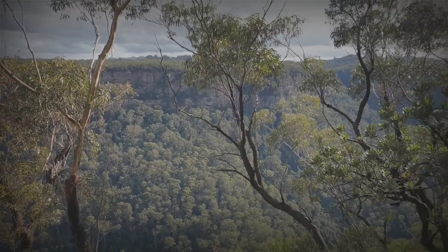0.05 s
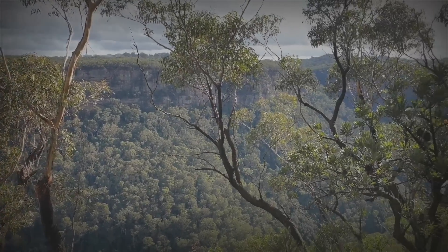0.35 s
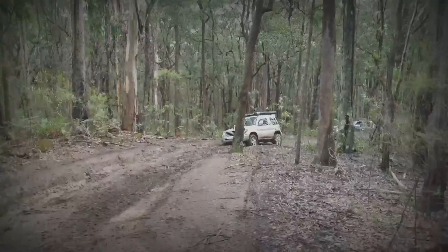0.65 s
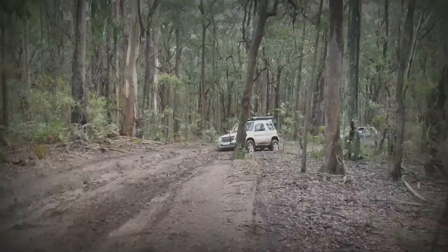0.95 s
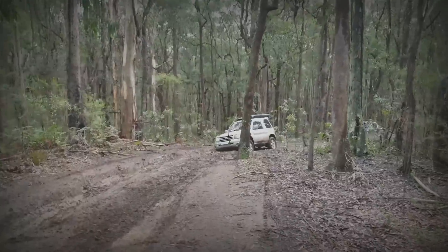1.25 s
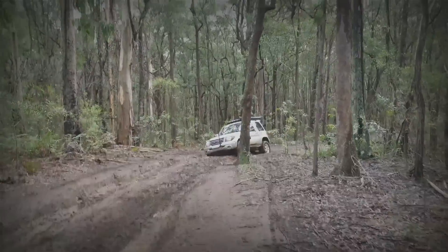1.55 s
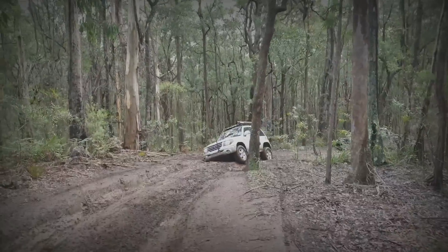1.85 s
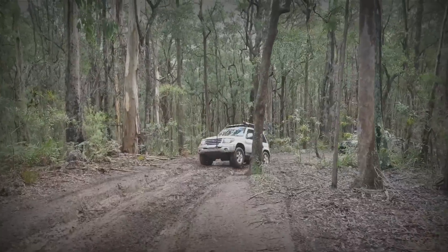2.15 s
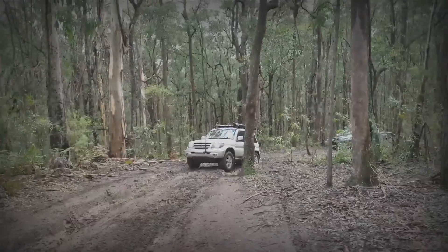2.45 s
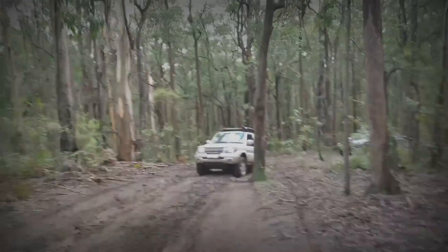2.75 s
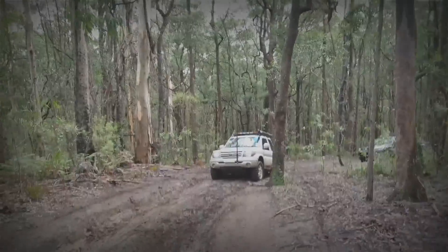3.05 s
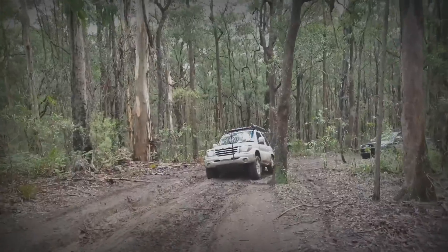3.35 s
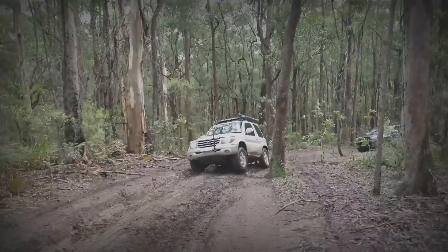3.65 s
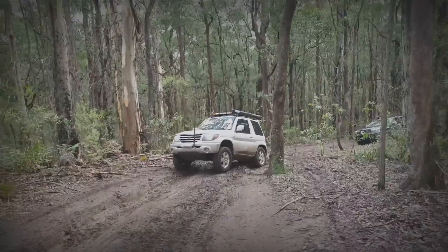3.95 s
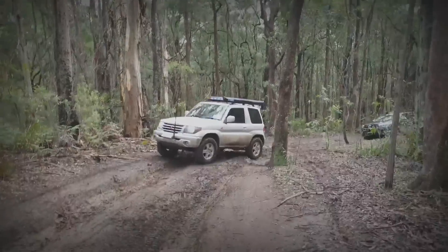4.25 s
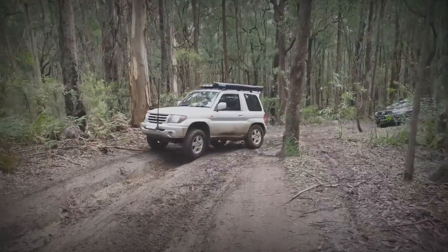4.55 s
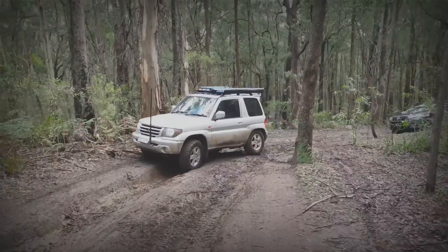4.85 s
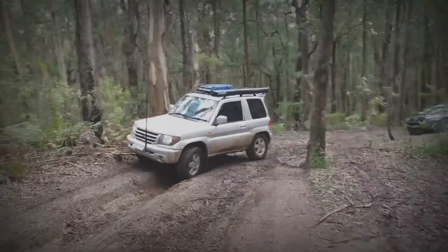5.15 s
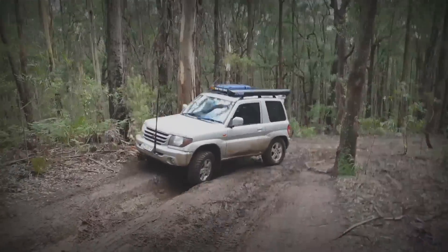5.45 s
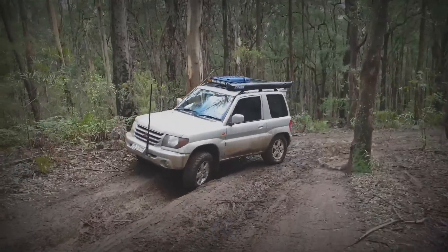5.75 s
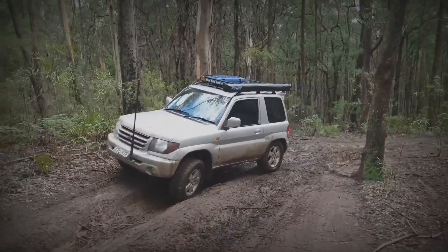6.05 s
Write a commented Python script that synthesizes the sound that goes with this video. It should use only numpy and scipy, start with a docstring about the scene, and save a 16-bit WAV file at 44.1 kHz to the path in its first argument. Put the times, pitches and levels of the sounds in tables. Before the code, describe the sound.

It opens very quietly with valley air, a stir of leaves, a faint thin drone and one distant falling bird call. At about 0.7 seconds a small four-wheel drive takes over, much louder, crawling closer along a muddy forest track. Its engine chugs low at first, with a booming exhaust, then revs up from 2 seconds to a peak near 2.8. It stays high, growling and rasping under load, sags around 4.8, surges again just after 5 and eases toward 6 seconds. Tyres rumble and crunch over leaves and grit throughout. From 2.5 seconds the wheels slip in short bursts, scrubbing, throwing dirt and scraping stones, with a faint metallic ringing. Twigs snap now and then, most clearly near 2.9, 4.6 and 6 seconds. The suspension gives double knocks around 2 and 4.4 seconds. The sound is stereo from the trackside, with a light echo from the trees.

```python
"""A stereo pair beside a muddy forest track. First, quiet valley air, leaves, one far bird and a thin drone
that stays. At 0.65 s a small four-wheel drive takes over, crawling from 22 m to 8 m off the microphones.
Its four-cylinder engine revs up and down: the exhaust booms, the intake growls and rasps, the fan rushes,
and trunks scatter the engine's tones. On the way in, tyres rumble and crunch, twigs snap and the
suspension knocks; from 2.5 s the wheels slip now and then, and after 4 s the car turns side-on."""
import sys
import numpy as np
from scipy import signal
from scipy.fft import rfft, irfft, next_fast_len
from scipy.io import wavfile
from scipy.ndimage import uniform_filter1d, map_coordinates

SR = 44100
rng = np.random.default_rng(int(sys.argv[2]) if len(sys.argv) > 2 else 0)


def output_pcm(signal):
    """Save a mono or channel-first signal as 16-bit PCM at the path in sys.argv[1].

    Samples are clipped to [-1, 1] before scaling.
    """
    pcm = np.clip(np.atleast_2d(signal).T, -1, 1) * 32767
    wavfile.write(sys.argv[1], SR, np.round(pcm).astype(np.int16))


N = 269451
T = np.arange(N) / SR
FREQS = np.fft.rfftfreq(N, 1 / SR)

# far-off air in the valley: (frequency [Hz], relative level [dB])
VALLEY_AIR = [(25, -20), (60, -2.5), (90, -0.5), (140, -15), (190, -8.5), (226, -0.5), (280, -14),
              (400, -26), (660, -20.5), (900, -20.5), (1600, -19), (2500, -23), (3600, -43), (5000, -65)]
# a breeze stirs the leaves; the level drops sharply at 0.5 s: (time [s], level [dB])
BREEZE = [(0, -61), (.04, -49.5), (.075, -66.5), (.24, -75.5), (.48, -73), (.5, -103)]
# rustle of those leaves: (frequency [Hz], relative level [dB])
LEAVES = [(1500, -2), (3300, 3), (4500, -2.5), (6800, 5.5), (8000, -4), (9500, 3), (11000, 0), (15500, -2)]
# a distant bird's falling call: (time [s], pitch [Hz], level [dB])
BIRD_CALL = [(.05, 2720, -80), (.085, 2520, -59), (.1, 2450, -58), (.13, 2050, -61), (.19, 1780, -61),
             (.25, 1340, -63), (.28, 1280, -85)]
# far-off drone: (frequency [Hz], level [dB])
DRONE_TONES = [(226, -63.5), (667, -72), (1570, -74)]

# twigs snapping on the track: (time [s], relative level [dB], band centre [Hz])
TWIG_SNAPS = [(0.751, -40.5, 11300), (0.954, -37, 9000), (1.1672, -48, 9000), (1.4531, -49, 4180),
              (1.651, -38, 3650), (1.703, -38, 6960), (2.876, -28, 3534), (4.57, -33, 6985),
              (5.381, -38, 5265), (6.018, -32, 4050)]
# suspension knocks: (time [s], relative level [dB], pitch against the chassis modes [ratio])
KNOCKS = [(1.167, -41, 1.65), (2.02, -29, 1), (2.083, -29.5, 1), (4.351, -27, 1.08), (4.385, -27, 1.05)]
# chassis modes: (frequency [Hz], relative level [dB], time to fall 60 dB [s])
CHASSIS_MODES = [(700, 39, 0.026), (980, 30, 0.052), (1085, 32, 0.069), (1190, 8, 0.043), (1460, 2, 0.033)]
# tyres rumbling on the ground: (frequency [Hz], relative level [dB])
GROUND_RUMBLE = [(20, -36), (31, -7), (42, -1), (65, 8.5), (100, 9.5), (135, 5), (180, 7.5), (300, -32)]
# leaf litter pressed under the tyres: (frequency [Hz], relative level [dB])
LEAF_LITTER = [(700, -1), (1400, 5.5), (2400, 0.5), (4200, -3.5), (6500, -8.5), (9000, -29), (15000, -36)]
# hiss of dirt and grit: (frequency [Hz], relative level [dB])
DIRT_HISS = [(3000, 9), (4800, 5.5), (6000, 3.5), (7200, 5.5), (8300, 0.5), (9300, 4), (10500, 3),
             (11500, 5), (12500, 1.5), (15500, 1)]
# tyres slipping: (time [s], length [s], scrub [dB], thrown dirt [dB], scrape [dB])
SLIPS = [(2.53, 0.091, -55, -49, -60), (2.623, 0.17, -48, -40, -61), (2.692, 0.065, -53, -40.5, -46),
         (3.14, 0.22, -42, -41.5, -45), (3.401, 0.45, -69, -57, -55), (3.827, 0.15, -42.5, -67, -70),
         (4.251, 0.19, -37.5, -45, -45), (4.92, 0.11, -44, -42.5, -54), (5.657, 0.42, -70, -58, -40.5)]
# scrub of the tread: (frequency [Hz], relative level [dB])
TREAD_SCRUB = [(700, -47), (950, 1), (1090, 12.5), (1280, 7), (1500, 0.5), (2200, -38)]
# stones scraping under a tyre: (frequency [Hz], relative level [dB])
STONE_SCRAPE = [(1500, -9.5), (2700, -6), (3700, -1.5), (4500, -4.5), (5600, -9), (8000, -13), (15000, -34)]

# rush of the fan: (frequency [Hz], relative level [dB])
FAN_RUSH = [(880, 4.5), (1500, -5.5), (1610, 4.5), (1900, 2), (2160, -6.5), (2370, 1.5), (3150, 2),
            (3420, -11), (3660, -3), (6000, -10), (7800, -45), (13200, -120)]
# share of valve rattle against the fan's rush; it swells mid-approach, dips near 4.6 s and partly
# returns: (time [s], share of power [0-1])
VALVE_SHARE = [(.66, 0), (2.7, 0.7), (3.8, 0.64), (4.6, 0.08), (6.11, 0.43)]
# engine block resonances: (frequency [Hz], width [Hz], relative level [dB])
BLOCK_MODES = [(1050, 330, 11.5), (1567, 130, 6), (2240, 60, 14), (3350, 39, -1.5), (3650, 900, 1.5),
               (4620, 160, 2)]
# drivetrain metal singing under strain: (time [s], length [s], centre [Hz], nominal width [Hz], level [dB])
METAL_RINGS = [(1.1, .3, 4760, 180, -67), (1.62, .8, 4780, 240, -63.5), (2.55, .3, 3190, 300, -47.5),
               (3.15, .65, 3190, 240, -46.5), (4.33, .14, 3190, 300, -50), (5.0, .35, 2900, 280, -50)]
# drone of the silencer's shell: (frequency [Hz], relative level [dB])
SILENCER_SHELL = [(150, -48), (200, -6.5), (232, 0.5), (258, -0.5), (310, -40)]
# low puffing of the intake air: (frequency [Hz], relative level [dB])
INTAKE_BODY = [(100, -18), (170, -64), (225, 12), (305, -3), (400, 14), (520, 7.5), (660, 1.5), (800, -6),
               (1100, -50)]
# rasp at the throttle: (frequency [Hz], relative level [dB])
INTAKE_RASP = [(500, 5.5), (820, 11), (1060, 1.5), (1250, 12), (1430, 1), (1600, 3), (1900, -6.5),
               (3000, -12.5)]
# bark of the open throttle: (frequency [Hz], relative level [dB])
INTAKE_BARK = [(280, -31), (420, 14), (580, -2), (690, -4), (820, 6.5), (1080, -15), (1400, 2), (2400, -52),
               (5000, -44)]
# intake resonances at the reference firing rate: (frequency [Hz], relative level [dB])
INTAKE_RESONANCES = [(200, 1.5), (275, 2.5), (305, -4.5), (345, 8.5), (410, -0.5), (470, -2.5), (535, 4.5),
                     (595, -0.5), (660, 8), (715, 0), (850, -9), (1020, 7), (1250, -25), (2000, -24)]
# exhaust boom off load: (firing rate [Hz], level [dB])
EXHAUST_BOOM = [(55, -32.5), (65, -26.5), (82, -25.5), (100, -31), (140, -31.5)]
# the boom drops out briefly: (time [s], level change [dB])
BOOM_DIPS = [(.95, -4.5), (1.295, -6.5), (1.42, -13), (2.359, -41), (2.6, -18), (2.83, -13), (3.03, -5),
             (3.135, -10), (3.49, -3.5), (4.27, -14), (4.53, -0.5), (5.45, -2), (5.87, -13)]
# engine speed: (time [s], firing rate [Hz])
REVS = [(.66, 54.6), (.97, 59.3), (1.2, 69.6), (1.38, 71.3), (1.49, 55.26), (1.7, 65.7), (1.93, 81.26),
        (2.1, 81.1), (2.26, 89.5), (2.51, 123.7), (2.68, 144.7), (2.8, 147), (3.0, 123.4), (3.11, 129.9),
        (3.24, 135.3), (3.42, 137.7), (3.55, 136.1), (3.67, 137.4), (3.87, 129.8), (4.03, 135.8),
        (4.18, 130.8), (4.31, 119.7), (4.48, 128.3), (4.62, 105.3), (4.88, 91), (5.08, 122.8),
        (5.24, 128.5), (5.42, 125), (5.6, 101.5), (5.85, 109.6), (6.11, 93)]
# pushes on the accelerator: (time [s], length [s], load [1 = hard pull],
# lift of firing order 1 [dB], of order 2 [dB], of order 3 [dB])
PEDAL_PUSHES = [(0.683, 0.092, 0.32, -2.5, 8, 4), (1.092, 0.35, 0.69, 3.5, 13, 0),
                (1.49, 0.46, 0.6, 5.5, 13.5, 13), (1.662, .27, 0.14, -2, 2, 0),
                (2.033, 0.27, 0.89, 10.5, 18, 13), (2.397, 0.21, 0.68, 6.5, 9, 18.5),
                (2.607, 0.084, 0.19, 13, 16, 25), (2.8, 0.09, 0.046, 7.5, 3, 0),
                (3.005, 0.084, 0.49, 10, 12, 7), (3.146, 0.072, 0.51, 14.5, 4, 14),
                (3.29, 0.12, 0.19, 6.5, 1, 6), (3.418, 0.34, 0.57, 9.5, 2, 10),
                (3.787, 0.14, 0.66, 3.5, 5, 17), (3.934, 0.21, 0.42, 10.5, 6.5, 14),
                (4.18, 0.24, 0.68, 4, 9, 14), (4.881, 0.08, 1.47, 15, 25.5, 7),
                (5.027, 0.12, 0.45, 2.5, -2, 11), (5.13, 0.21, 0.1, 7.5, -2, 16),
                (5.597, 0.18, 0.92, 3, 9, 7), (5.992, .15, 0.31, 6.5, -1, 4)]

# stereo width at the microphones: (frequency [Hz], side minus mid [dB])
MIC_WIDTH = [(60, -21), (125, -16.5), (250, -4.5), (500, -7), (1000, -4), (2000, -4.5), (4000, -3),
             (12000, 0.55)]
# balance of the pair: (frequency [Hz], left minus right [dB])
MIC_BALANCE = [(60, 1), (110, 1.5), (200, -0.5), (380, 3.5), (700, 3), (1290, 5), (2380, 1.5), (4400, -2.5),
               (8120, 2), (15000, 2)]

# level laws: (level off load at REF_HZ and REF_M [dB], change per doubling of revs [dB],
# per halving of distance [dB], per unit of load [dB])
RUMBLE_LAW, LITTER_LAW, DIRT_LAW = (-36, 4, 1.5, 2), (-50, 5, 12.5, -1), (-47.5, 15.5, 4, 4)
BAY_LAW, SHELL_LAW = (-45, 16, 1, 0.2), (-42.5, 9, 11, -2)
BODY_LAW, RASP_LAW = (-47, 12, -2, 4.5), (-43.5, 13, 10, -1)
BARK_LAW, GROWL_LAW = (-61.5, 14, -0.5, 18), (-48, 16, -3.4, 14.5)
ORDER_2_LAW, ORDER_3_LAW = (-39, -1.5, 10.5, -5), (-50.5, 2.5, 6.5, 1.5)
REF_HZ, REF_M = 100, 14  # reference firing rate and distance from the microphones
START_M, CRAWL_M_S = 23.87, 2.54  # distance at time zero, speed of approach


def undb(db):
    """Decibels to gain."""
    return 10 ** (np.asarray(db) / 20)


def unit(x):
    """Scale to rms 1."""
    return x / np.sqrt(np.mean(x ** 2))


def curves(table):
    """Each column of a timed table, sample by sample."""
    times, *columns = np.transpose(table)
    return [np.interp(T, times, column) for column in columns]


def response(points, hz):
    """Gain of a spectrum table at the given frequencies."""
    freqs, db = np.transpose(points)
    return undb(np.interp(np.log(hz + 1), np.log(freqs + 1), db))


def colour(x, points):
    """Filter by a spectrum table; rms 1."""
    return unit(irfft(rfft(x) * response(points, FREQS), N))


def walk(rate):
    """Smooth random wandering of spread about 1, with `rate` new values a second."""
    knots = rng.standard_normal(1024)
    coarse = np.arange(0, N + 64, 64)
    path = map_coordinates(knots, [coarse / SR * rate], order=3, mode="wrap")
    return np.interp(np.arange(N), coarse, path)


def swell(s, length_s, rise_s, fall_s):
    """Rise from time s, hold, and fall once the length is over: 0-1."""
    return np.clip((T - s) / rise_s, 0, 1) * np.clip(1 - (T - s - length_s) / fall_s, 0, 1)


def spread(pair):
    """Two unrelated signals to the microphones: alike in the bass, unrelated in the treble."""
    side = irfft(rfft(pair[1]) * response(MIC_WIDTH, FREQS), N)
    return np.array([pair[0] + side, pair[0] - side])


def diffuse():
    """Broadband noise from all round the pair."""
    return spread(rng.standard_normal((2, N)))


def noise(points):
    """Diffuse stereo noise with a given spectrum; rms 1."""
    return colour(diffuse(), points)


def add(out, s, sound):
    """Mix a short stereo sound in at time s."""
    start = int(s * SR)
    out[:, start:start + sound.shape[1]] += sound[:, :N - start]


def forest(x, t60_s):
    """Trunks scatter sound back to the microphones from all sides; the bass passes between them."""
    t = T[:SR]
    echoes = rng.standard_normal((2, len(t))) * undb(-60 * t / t60_s) * (t > .012)
    echoes /= np.sqrt(np.sum(echoes ** 2, axis=1, keepdims=True))
    scattered = signal.fftconvolve(x[None], echoes, axes=1)[:, :N]
    return signal.sosfilt(signal.butter(1, 300, "high", fs=SR, output="sos"), scattered)


def bird():
    """One falling call, far off, reaching the microphones only through its echoes."""
    hz, db = curves(BIRD_CALL)
    wavering_hz = hz * (1 + 0.0166 * walk(121))
    call = undb(db) * np.sin(2 * np.pi * np.cumsum(wavering_hz) / SR)
    return forest(call, t60_s=0.28)


def valley(air_db=-56):
    """Faint far-off air with a stir of leaves and one bird."""
    call = bird()
    leaves = undb(curves(BREEZE)[0] + walk(108)) * noise(LEAVES)
    air = undb(air_db + 0.65 * walk(8.7)) * noise(VALLEY_AIR)
    return air + leaves + call


def drone():
    """Thin far-off tones that waver a little and never stop."""
    return sum(undb(db + 2 * walk(48)) * np.sin(2 * np.pi * hz * T + 0.5 * walk(14))
               for hz, db in DRONE_TONES)


def twigs(trim_db=-1, rise_s=0.00099, decay_s=0.0095):
    """Each twig on the track breaks with a short bright crack."""
    out, t = np.zeros((2, N)), T[:4096]
    envelope = np.minimum(t / rise_s, 1) * np.exp(-t / decay_s)
    for s, db, hz in TWIG_SNAPS:
        band = signal.butter(1, [hz / 2, min(hz * 2, 18000)], "band", fs=SR, output="sos")
        crack = signal.sosfilt(band, rng.standard_normal((2, len(t)))) * envelope
        add(out, s, undb(db + trim_db) * crack)
    return out


def suspension(trim_db=4, crack_db=-6, crack_s=0.0013):
    """The suspension jolts in the ruts: a dry crack that rings the chassis."""
    out, t = np.zeros((2, N)), T[:8192]
    band = signal.butter(1, [700, 3600], "band", fs=SR, output="sos")
    for s, db, pitch in KNOCKS:
        ring = np.zeros((2, len(t)))
        for hz, mode_db, t60_s in CHASSIS_MODES:
            phase = 2 * np.pi * pitch * hz * t + rng.uniform(0, np.pi, (2, 1))
            ring += undb(mode_db - 60 * t / t60_s) * np.sin(phase)
        crack = unit(signal.sosfilt(band, rng.standard_normal((2, len(t))))) * np.exp(-t / crack_s)
        add(out, s, undb(db + trim_db) * (ring / np.abs(ring).max() + undb(crack_db) * crack))
    return out


def ground_bounce(x, delay_s=.0019, echo_db=-14, sway=.012):
    """Add the reflection off the ground under the car; its delay wanders as the car pitches."""
    late = T - delay_s * (1 + sway * walk(3.12))
    echo = np.array([np.interp(late, T, side) for side in x])
    return (x + undb(echo_db) * echo) / np.hypot(1, undb(echo_db))


def level_db(law, hz, load):
    """Level of one part of the car, set by revs, distance from the microphones and load."""
    rest_db, revs_db, near_db, load_db = law
    metres = np.maximum(START_M - CRAWL_M_S * T, 1)
    return rest_db + revs_db * np.log2(hz / REF_HZ) + near_db * np.log2(REF_M / metres) + load_db * load


def crunch(rate=260, size_db=2.0, decay_s=0.00072):
    """Grit and dry leaves crack under the tyres: many small grains, a few large ones."""
    hits = rng.random((2, N)) < rate / SR
    grains = hits * undb(size_db * np.minimum(rng.exponential(size=(2, N)), 4))
    decay = np.exp(-2 * T[:512] / decay_s)
    power = signal.fftconvolve(grains[0] ** 2 + grains[1] ** 2, decay)[:N]
    return colour(spread(np.sqrt(np.abs(power)) * rng.standard_normal((2, N))), DIRT_HISS)


def tyres(hz, load, crunch_db=-6.5):
    """The tyres rumble, hiss and crunch; where they slip they scrub, throw dirt and scrape over stones."""
    scrub_gain, thrown_gain, scrape_gain = sum(
        np.outer(undb(dbs), swell(s, length_s, rise_s=0.047, fall_s=0.11)) for s, length_s, *dbs in SLIPS)
    # tread blocks catch and let go, so the scrub stutters
    scrub = scrub_gain * undb(1.6 * walk(110)) * noise(TREAD_SCRUB)
    dirt_gain = np.hypot(undb(level_db(DIRT_LAW, hz, load)), thrown_gain) * undb(walk(21.96))
    rumble = undb(level_db(RUMBLE_LAW, hz, load)) * noise(GROUND_RUMBLE)
    litter = undb(level_db(LITTER_LAW, hz, load) + 0.59 * walk(17)) * noise(LEAF_LITTER)
    scrape = scrape_gain * undb(2 * walk(70)) * noise(STONE_SCRAPE)
    dirt = dirt_gain * (noise(DIRT_HISS) + undb(crunch_db) * crunch())
    return scrub + scrape + dirt + litter + rumble


def pedal(rise_s=0.1, load_fall_s=0.15, boom_fall_s=0.11):
    """Each push loads the engine and lifts three exhaust orders, which die away sooner than the intake."""
    load, lift_dbs = np.zeros(N), np.zeros((3, N))
    for s, length_s, strength, *dbs in PEDAL_PUSHES:
        load += strength * swell(s, length_s, rise_s, load_fall_s)
        lift_dbs += np.outer(dbs, swell(s, length_s, rise_s, boom_fall_s))
    return load, lift_dbs


def overrun_db(hz, closed_db=-6, full_rate=1.63):
    """When the revs fall the throttle is shut and the engine's tones drop back."""
    falling = -np.gradient(uniform_filter1d(np.log(hz), size=6000)) * SR
    return closed_db * np.clip(falling / full_rate, 0, 1)


def side_on_db(start_s=4.12, turning_s=0.72, away_db=-5.5):
    """The upper intake sound fades as the car turns and its intake points away from the microphones."""
    return away_db * np.clip((T - start_s) / turning_s, 0, 1)


def roughness(hz):
    """The engine chugs cleanly at low revs and gets rougher with speed: 1 at REF_HZ."""
    return (hz / REF_HZ) ** .6


def per_firing(phase, rate):
    """No two firings are alike: smooth scatter in step with the engine, `rate` new values a firing."""
    return map_coordinates(rng.standard_normal(2048), [phase / (2 * np.pi) * rate], order=3, mode="wrap")


def puffs(phase, depth, scatter_db):
    """Gas flow swells once a firing, unevenly."""
    return unit(np.exp(depth * np.cos(phase)) * undb(scatter_db * walk(90)))


def rattle(phase, firings=4, size=1024):
    """A repeating stereo clatter: four firings make an engine cycle, two a turn of the crank."""
    place = phase / (2 * np.pi * firings) * size % size
    loops = rng.standard_normal((2, size))
    return spread([map_coordinates(loop, [place], order=3, mode="grid-wrap") for loop in loops])


def valves(phase):
    """Valve gear and pistons rattle and ring the block."""
    block = sum(undb(db) / (1 + 2j * (FREQS - hz) / width) * FREQS / (FREQS + hz / 2)
                for hz, width, db in BLOCK_MODES)
    return unit(irfft(rfft(rattle(phase)) * block, N))


def engine_bay(phase):
    """A shifting blend of the fan's rush and the rattle of the valves."""
    share = curves(VALVE_SHARE)[0]
    return np.sqrt(1 - share) * noise(FAN_RUSH) + np.sqrt(share) * valves(phase)


def drivetrain(phase, repeat_share=.7):
    """Narrow metallic resonances, shaken by the repeating rattle and an uneven jolt at each firing."""
    jolts = puffs(phase, depth=0.39, scatter_db=7.0) * diffuse()
    shaking = rfft(np.sqrt(repeat_share) * rattle(phase) + np.sqrt(1 - repeat_share) * jolts)
    out = np.zeros((2, N))
    for s, length_s, hz, width, db in METAL_RINGS:
        ring = unit(irfft(shaking / (1 + 1.3j * (FREQS - hz) / width) ** 2, N))
        out += undb(db) * swell(s, length_s, rise_s=0.094, fall_s=0.094) * ring
    return out


def alternator(phase, whine_db=-46, cycles_per_firing=16.2):
    """A brief whine; the belt spins the alternator, so its pitch follows the revs."""
    whine = undb(whine_db + 2 * walk(22)) * np.cos(cycles_per_firing * phase + .7 * walk(70))
    return swell(s=3.54, length_s=.55, rise_s=0.057, fall_s=0.057) * whine


def intake_rasp(phase, hz, load, repeat_share=.45):
    """Air tears past the throttle: a buzz locked to the crank, mixed with free turbulence."""
    buzz = colour(rattle(phase + .07 * walk(30), firings=2, size=160), INTAKE_RASP)
    air = np.sqrt(repeat_share) * buzz + np.sqrt(1 - repeat_share) * noise(INTAKE_RASP)
    gain = undb(level_db(RASP_LAW, hz, load) + side_on_db())
    return gain * air * puffs(phase, depth=0.1, scatter_db=3.5)


def intake_bark(phase, hz, load, lag_s=0.04):
    """Just after the throttle opens wide, each firing gulps air in a sharp, uneven burst."""
    gulps = puffs(phase, depth=1.6, scatter_db=3)
    late_load = np.interp(T - lag_s, T, load)
    return undb(level_db(BARK_LAW, hz, late_load)) * colour(gulps * diffuse(), INTAKE_BARK)


def intake_growl(phase, hz, load, crank_db=-9, cam_db=-15, octave_db=-14, formant_hz=430, beam_hz=750):
    """Higher orders sweep through the intake resonances; unequal cylinders add weaker lines between."""
    out, power, rough = np.zeros(N), np.zeros(N), roughness(hz)
    uneven_phase = phase + .055 * rough * per_firing(phase, 0.98)
    stretch = (hz / REF_HZ) ** 0.1  # the resonances rise with the flow
    between_db = 5 * np.log2(hz / hz.max())  # the lines between orders grow with the revs
    away_db = side_on_db()
    for quarter in range(5, 49):
        order = quarter / 4
        on_firing, on_crank = quarter % 4 == 0, quarter % 2 == 0
        if (on_firing and order <= 3) or (not on_crank and order > 8):
            continue
        line_hz = order * hz
        db = 0 if on_firing else between_db + (crank_db if on_crank else cam_db)
        db += octave_db * max(np.log2(order / 5.27), 0)
        db += away_db * (line_hz / beam_hz) ** 2
        # paths between the trunks shift as the car moves: each line fades and wavers on its own
        fade_db = 2.8 * rough * walk(40) + 3 * walk(9)
        wavering_phase = uneven_phase + 0.074 * rough * walk(32)
        gain = undb(db + fade_db) * response(INTAKE_RESONANCES, line_hz / stretch)
        out += gain * np.cos(order * wavering_phase + rng.uniform(0, 2 * np.pi))
        power += gain ** 2 / (1 + (formant_hz / line_hz) ** 8)
    # the lines in the main resonance share one flow of air
    out /= np.sqrt(uniform_filter1d(power, size=2048) / 2)
    scatter_db = 1.5 * rough * per_firing(phase, 0.93)
    return undb(level_db(GROWL_LAW, hz, load) + overrun_db(hz) + scatter_db) * out


def exhaust(phase, hz, load, lift_dbs, dip_width_s=0.041):
    """The pipe booms at the firing rate, under two overtones that waver and fade on their own."""
    dips_db = sum(db * np.exp(-((T - s) / dip_width_s) ** 2) for s, db in BOOM_DIPS)
    boom_db = 20 * np.log10(response(EXHAUST_BOOM, hz)) + dips_db
    overtone_dbs = [level_db(law, hz, load) + overrun_db(hz) for law in (ORDER_2_LAW, ORDER_3_LAW)]
    order_dbs = lift_dbs + np.array([boom_db, *overtone_dbs])
    out, rough = np.zeros(N), roughness(hz)
    for order, db in enumerate(order_dbs, 1):
        waver = (order - 1) * rough
        out += undb(db + waver * walk(18)) * np.sin(order * phase + .22 * waver * walk(28))
    return np.sqrt(2) * out * undb(1.3 * rough * per_firing(phase, .5))


def engine_noise(phase, hz, fan_hz, load):
    """The intake puffs, rasps and barks, the silencer drones, metal rings and the engine bay rushes."""
    body = undb(level_db(BODY_LAW, hz, load)) * noise(INTAKE_BODY)
    body *= puffs(phase, depth=0.35, scatter_db=-2.9)
    rasp = intake_rasp(phase, hz, load)
    bay = engine_bay(phase)
    shell = undb(level_db(SHELL_LAW, hz, load)) * noise(SILENCER_SHELL)
    bark = intake_bark(phase, hz, load)
    metal = drivetrain(phase)
    bay_gain = undb(level_db(BAY_LAW, fan_hz, load) + 1.6 * walk(16))
    return body + shell + rasp + bark + metal + bay_gain * bay


def car(on_track, forest_db=-11, inertia_s=0.45, fan_lag_s=0.081, right_lag_samples=2):
    """The car closes on the microphones: the revs set the engine's pitch and pulse, the pedal its load."""
    hz = curves(REVS)[0]
    # the fan and the wheels even out quick changes of revs
    even_hz = uniform_filter1d(hz, size=int(inertia_s * SR))
    fan_hz = np.interp(T - fan_lag_s, T, even_hz)
    load, lift_dbs = pedal()
    wavering_hz = hz * (1 + 0.005 * walk(35) + 0.004 * walk(12))
    phase = 2 * np.pi * np.cumsum(wavering_hz) / SR  # one cycle a firing
    tones = intake_growl(phase, hz, load) + alternator(phase) + exhaust(phase, hz, load, lift_dbs)
    noises = ground_bounce(engine_noise(phase, hz, fan_hz, load) + tyres(even_hz, load))
    left, right = on_track * (tones + noises)
    # the car is slightly to the left, so its sound reaches the right microphone later
    direct = np.array([left, np.pad(right, (right_lag_samples, 0))[:N]])
    return direct + undb(forest_db) * forest(on_track * tones, t60_s=.55)


def scene(car_start_s=0.65, fade_s=0.067):
    """The valley air gives way to the car on the track; the far drone carries on."""
    on_track = np.clip((T - car_start_s) / fade_s, 0, 1)
    return (1 - on_track) * valley() + drone() + car(on_track) + twigs() + suspension()


def record(dry, top_hz=15650):
    """The two microphones differ in colour; the top is cut."""
    size = next_fast_len(N + 4096)
    lean = np.sqrt(response(MIC_BALANCE, np.fft.rfftfreq(size, 1 / SR)))
    heard = irfft(rfft(dry, size) * np.array([lean, 1 / lean]), size)[:, :N]
    return signal.sosfilt(signal.ellip(10, .1, 80, top_hz, fs=SR, output="sos"), heard)


dry = scene()
out = record(dry)
output_pcm(out)
```